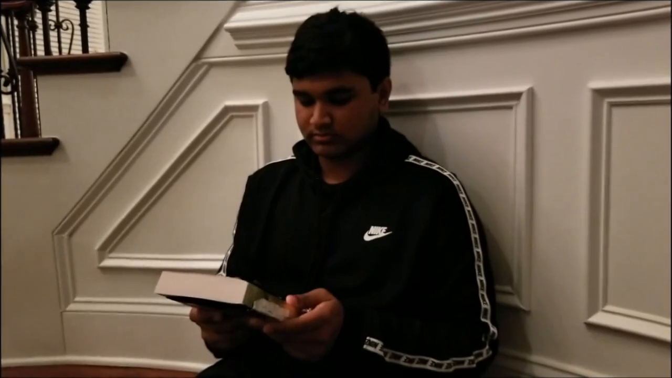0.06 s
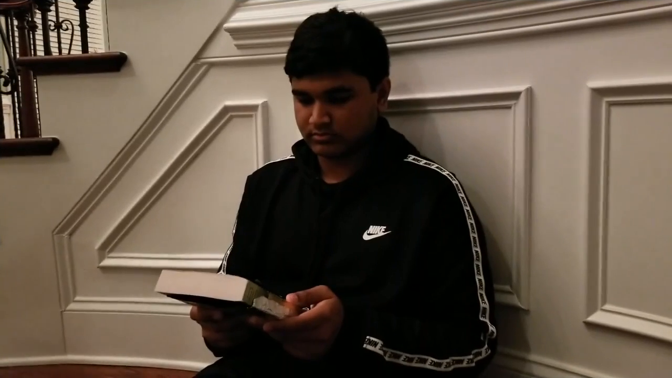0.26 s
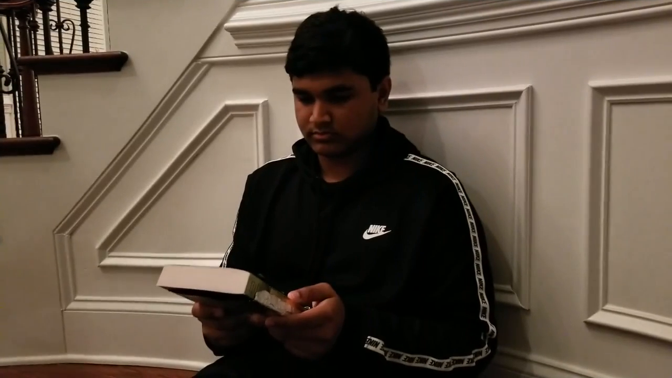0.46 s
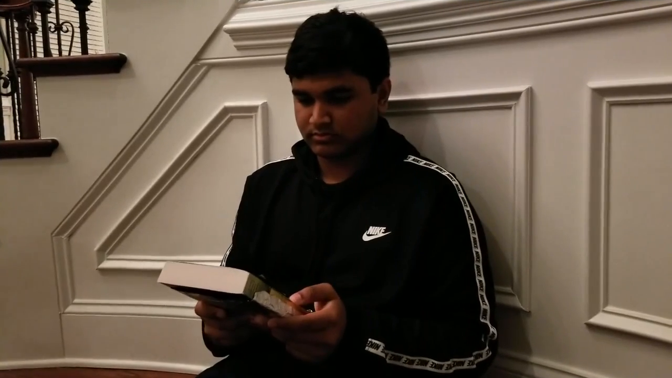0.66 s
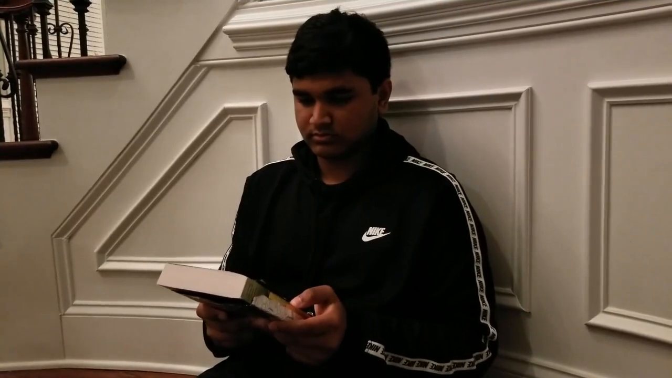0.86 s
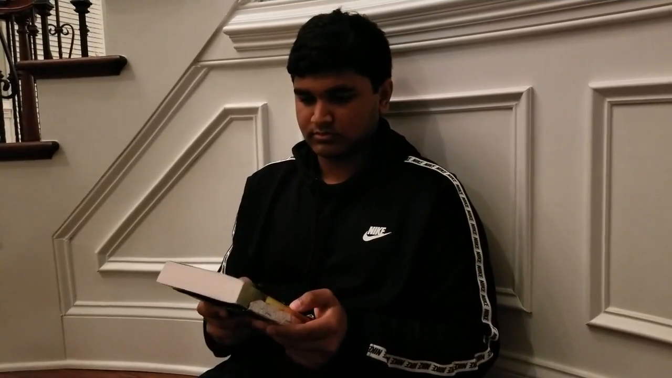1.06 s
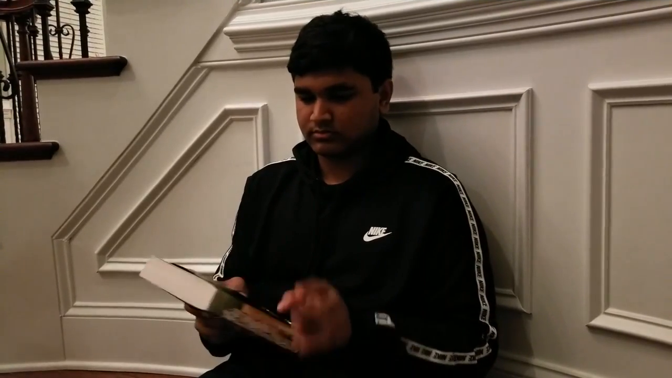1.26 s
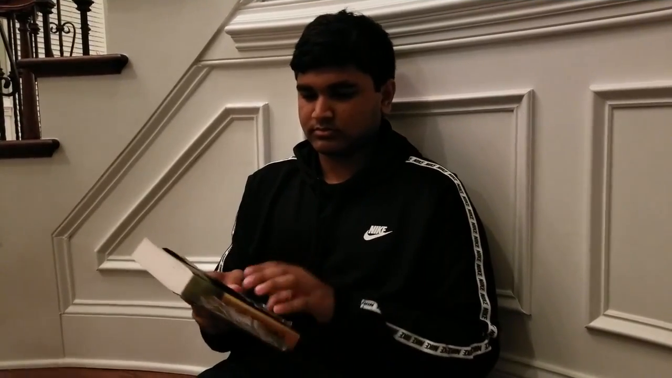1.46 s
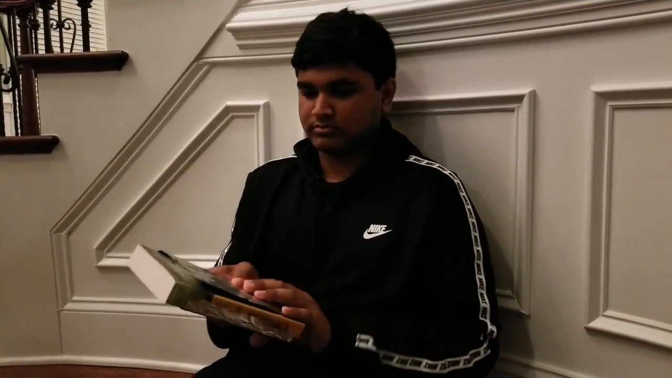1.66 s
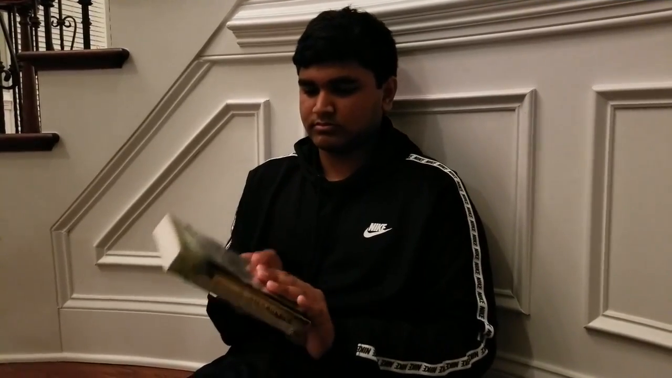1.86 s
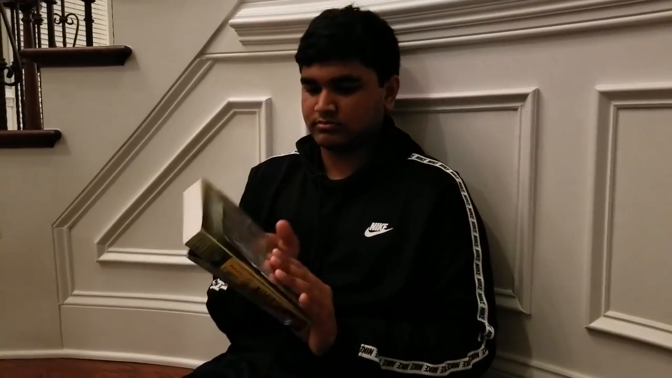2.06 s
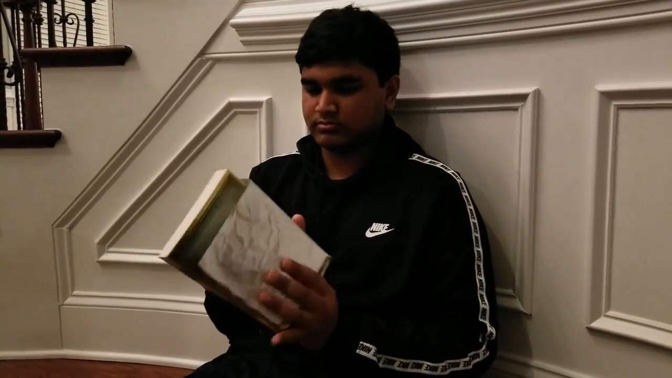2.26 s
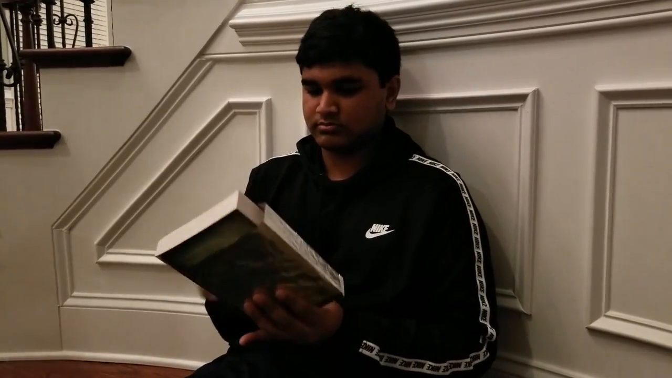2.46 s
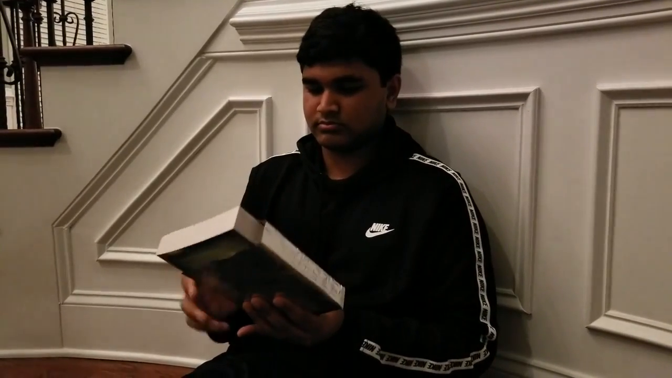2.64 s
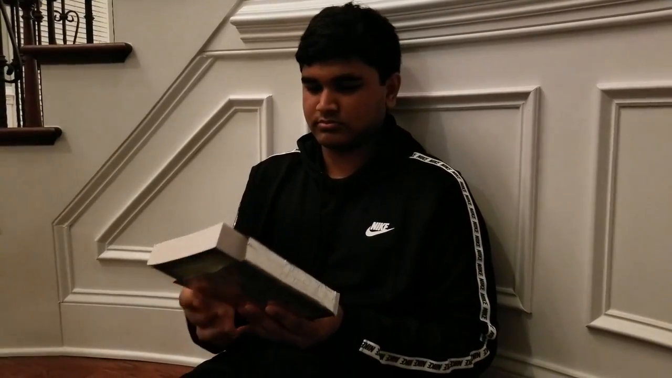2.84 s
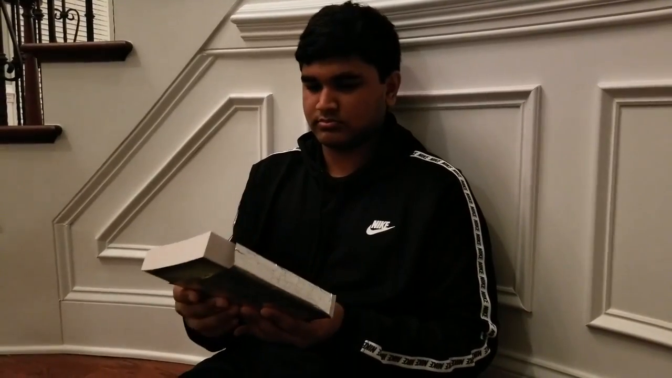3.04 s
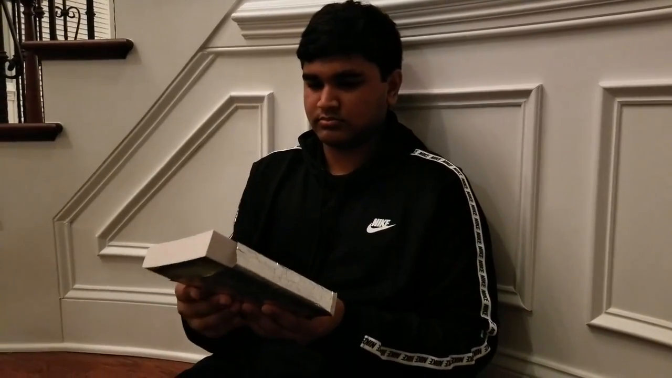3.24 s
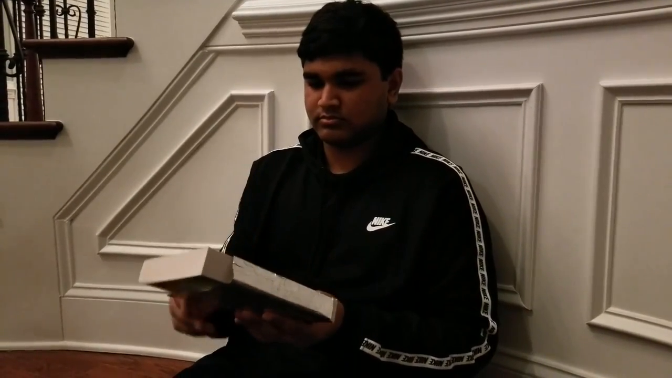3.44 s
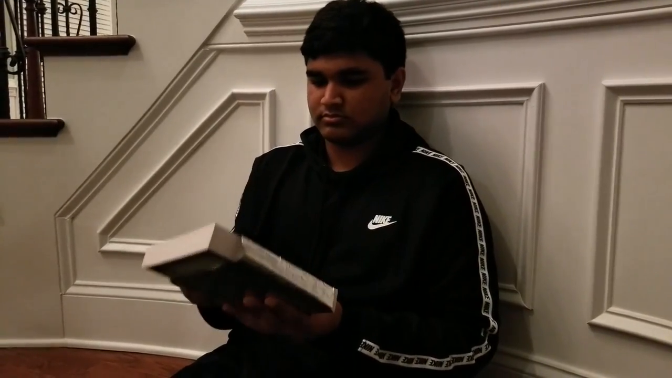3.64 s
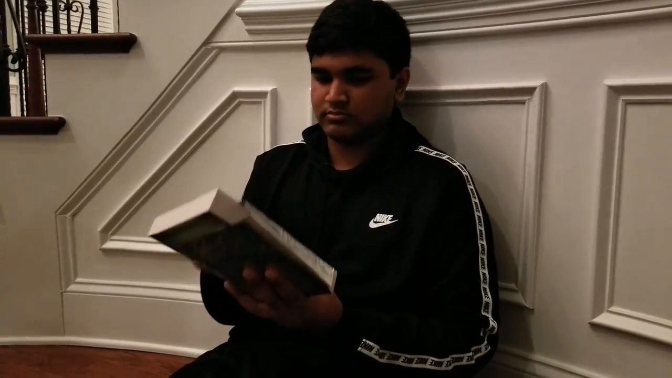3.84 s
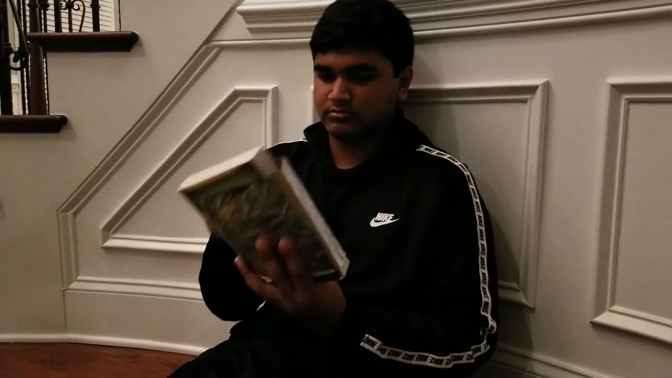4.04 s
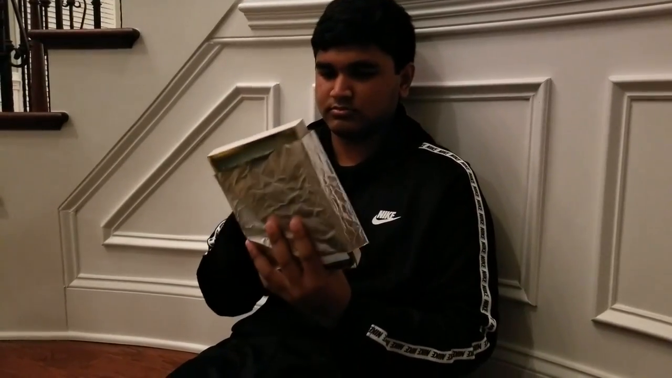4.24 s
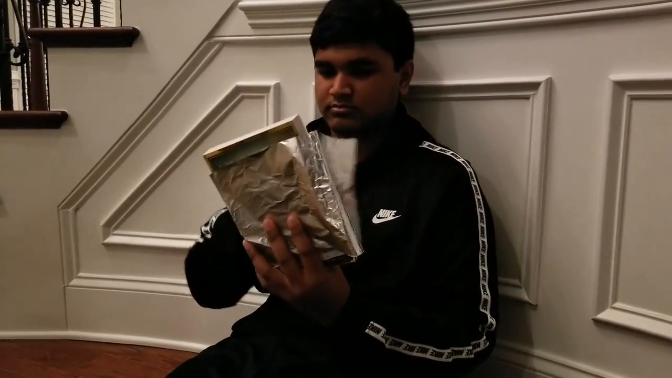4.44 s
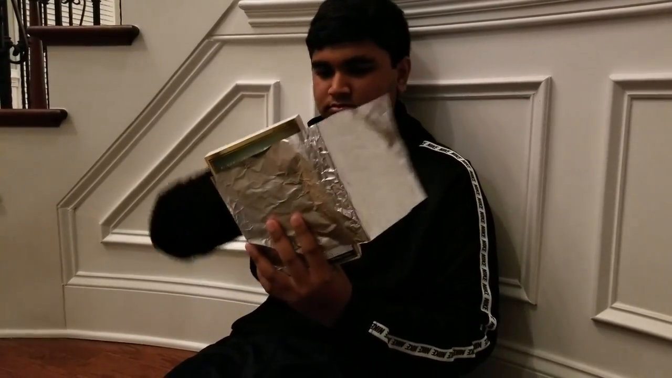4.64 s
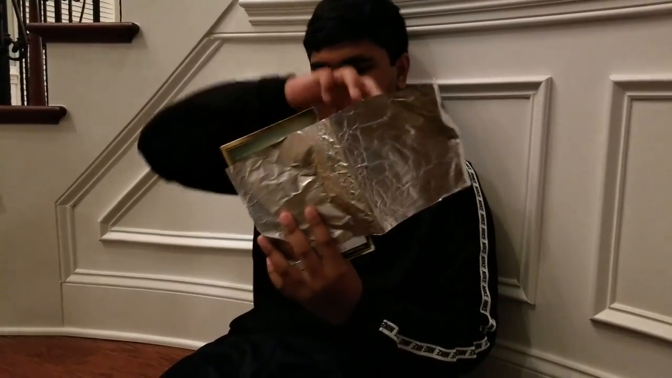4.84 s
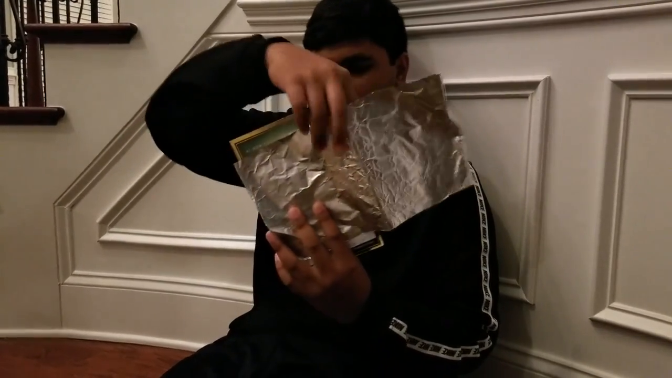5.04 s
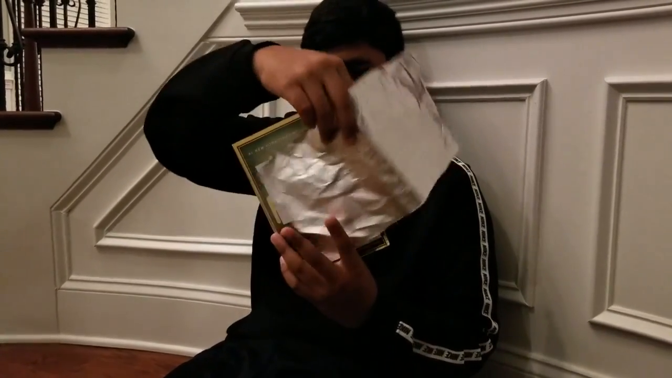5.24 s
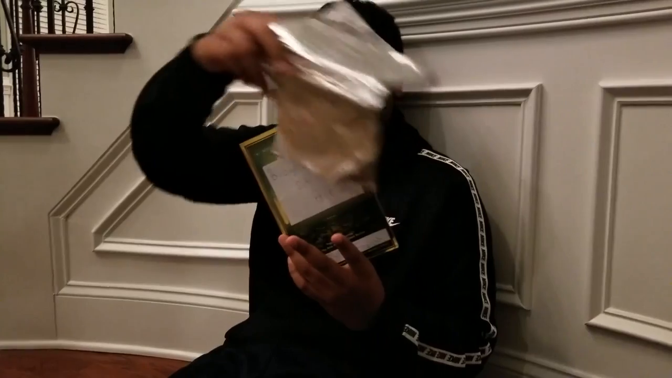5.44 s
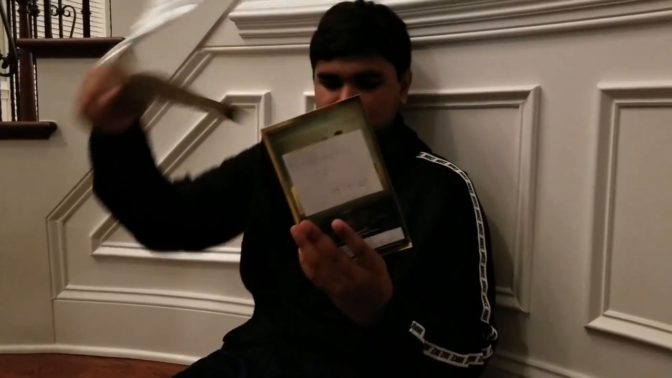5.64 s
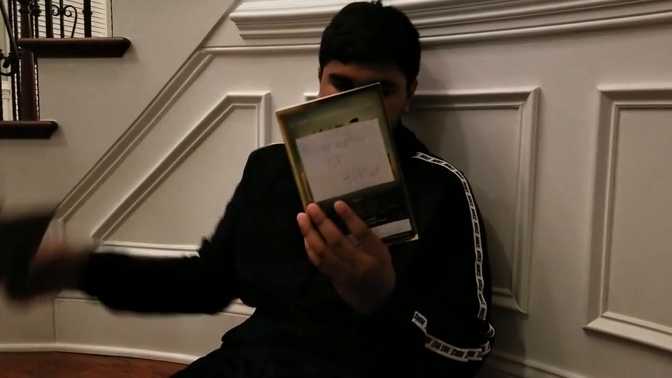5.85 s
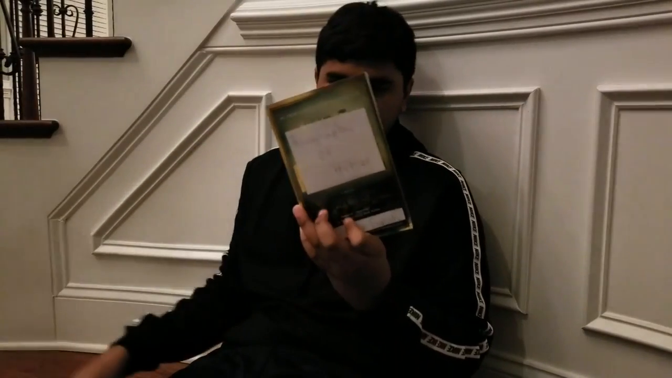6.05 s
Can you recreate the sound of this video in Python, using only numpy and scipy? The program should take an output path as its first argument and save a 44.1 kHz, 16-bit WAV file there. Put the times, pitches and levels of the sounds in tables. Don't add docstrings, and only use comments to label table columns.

```python
import sys
import numpy as np
from scipy import signal
from scipy.io import wavfile

SR = 44100
rng = np.random.default_rng(int(sys.argv[2]) if len(sys.argv) > 2 else 0)


def gain_from_db(level_db):
    decades = np.asarray(level_db, float) / 20
    return 10 ** decades


def unload_audio(sound):
    columns = np.transpose(np.atleast_2d(sound))
    steps = np.round(np.clip(columns, -1, 1) * 32767)
    wavfile.write(sys.argv[1], SR, steps.astype(np.int16))


N = 269010

# low_hz, high_hz
ZONES = [
    (3000, 9000),
    (9000, 16000),
    (900, 3000),
    (300, 620),
]
# pitch_hz, density_db (per Hz)
SHEET_COLOUR = [(150, -47), (250, -18.5), (381, -17), (487, -16), (795, -19.5), (1030, -12), (1320, -15),
                (1880, -9.5), (2850, -7.5), (3920, 2), (6070, 0.5), (9420, 1), (12500, 7), (15700, 3),
                (16500, -24)]
# peak_s, level_db, swell_s (per 60 dB), fade_t60_s,
# brightness_db
HAND_STROKES = [(0.189, -62.5, 5, 0.29, 8.5), (.599, -69, -0.5, 1.1, 5.5), (.85, -77.5, 10, 2.9, 11),
                (1.013, -72.5, 0.4, 1.4, 11.5), (1.192, -53.5, 0.13, 0.47, 3), (1.536, -54, 0.02, 0.47, 7.5),
                (1.891, -51, .5, 0.79, 3.5), (2.116, -51.5, 0.44, 0.56, 1.5), (2.121, -41, 0.14, 0.044, -2),
                (2.224, -58.5, -0.5, 0.068, 8), (2.444, -39, 0.22, 0.37, 0.5), (2.64, -67, -5.36, 5.5, -5),
                (2.963, -44, 0.2, 0.31, -1.5), (3.171, -50, 0.24, 0.14, 1), (3.25, -56.5, 0.6, 0.2, -15),
                (3.418, -52.5, -0.07, 0.48, 3), (3.573, -45.5, 0.31, 0.48, -11),
                (3.695, -44, 0.02, 0.74, -7.5),
                (3.922, -43.5, 0.76, 0.6, -7), (4.046, -43.5, 0.2, 0.69, -4), (4.196, -45.5, 0.5, 0.58, 1),
        (4.12, -50.5, 0.5, 0.087, 6), (4.27, -40.5, 0.03, 0.11, -1), (4.281, -42.5, 1, 1.9, -5.5),
        (4.619, -42.5, -0.08, 0.28, 10), (5.084, -30, 0, 0.79, 1.5), (5.148, -28.5, 0.04, 0.091, -13),
        (5.295, -29, 0.1044, 0.23, 0.5), (5.32, -35.5, 0.14, 0.11, 2), (5.635, -42, 0.77, 0.14, 2),
        (5.7, -55, 3.5, 1.1, -11), (5.849, -47, -0.34, 0.29, -7), (5.967, -46.5, 0.1, 1.9, -8),
        (6.099, -38, 0.28, .2, -13)]
# start_s, length_s, level_db, brightness_db
PULLS = [
    (4.368, 0.16, -44.5, -23),
    (4.618, .275, -45, -3),
    (5.374, 0.16, -46.5, 8),
]
# time_s, low_zone_minus_middle_db
LOOSE = [(.19, -12), (2, -16), (2.4, -15.5), (3, -16), (3.2, -28), (3.42, -9), (3.57, -21), (3.7, -7.5),
         (3.92, -22), (4.19, -12.5), (4.25, -8.5), (4.3, -17), (4.47, -9), (4.6, 0), (4.7, -7.5),
         (4.95, -1.5), (5.15, -18), (6, -18)]
RESTING_DB = [-97, -97, -88, -81.5]
# start_s, peak_db, brightness_db, ring_t60_s
TICKS = [(.4906, -45.5, 0, 0.045), (.5806, -28.5, 0, 0.013), (.7513, -32, -2.5, 0.02),
         (.9977, -42, 12, 0.061), (1.0994, -44, 7.5, 0.047), (1.152, -42.5, 14, 0.028),
         (1.1653, -30, -7, 0.024), (1.2648, -33.5, 2.5, 0.039), (1.3873, -45.5, -7, 0.05),
         (1.519, -44.5, 10, 0.071), (1.5255, -35, 12, 0.024), (1.577, -35, -1, 0.075),
         (1.694, -54, 13.5, 0.048), (1.7552, -33.5, 12.5, 0.023), (1.8146, -46, 6, 0.12),
         (1.8422, -39.5, 7, 0.024), (1.8824, -38, 1, 0.057), (1.8976, -31.5, 1, 0.023),
         (1.935, -37.5, 4.5, 0.14), (2.0344, -48, 8, .03), (2.0562, -39, 2, 0.077),
         (2.1138, -19.5, -5, 0.032), (2.3775, -44.5, 1, .022), (2.392, -31, -4, 0.14),
         (2.4099, -34.5, 2.5, 0.19), (2.899, -42, -5.5, 0.16), (2.913, -39, 2, 0.13),
         (2.9495, -21, -7.5, 0.052),
         (3.276, -39.5, 1, 0.014), (3.403, -36, -11, 0.082), (3.464, -25.5, -11, .041),
                (3.4965, -31.5, 2, 0.019), (3.556, -29, -5, 0.073), (3.565, -34.5, 2, 0.18),
                (3.712, -26.5, 1, 0.042), (3.8237, -23.5, -10.5, 0.04), (4.177, -35, 9.5, 0.019),
                (4.2, -22, 2, 0.03), (4.4619, -16, -3.5, 0.048), (4.491, -25.5, -5.5, 0.085),
                (4.752, -23.5, 0, 0.084), (5.091, -14.5, 0, 0.021), (5.1356, -21, -1, 0.0097),
                (5.147, -18.5, 4, 0.036), (5.1523, -18, 1.5, 0.047), (5.2213, -23.5, -4.5, 0.28),
                (5.27, -17.5, -3, 0.041), (5.727, -31, -7, 0.084), (5.841, -30.5, -10, 0.079),
                (6.0164, -24, 0, 0.061)]
# start_s, peak_db, brightness_db, ring_t60_s
CRACKS = [(.1884, -56, -5, .03), (.3155, -29.5, 7, 0.0073), (.3641, -50.5, 8, 0.035),
          (.5445, -52, 11, 0.041), (.6184, -49.5, 9, 0.033), (.7078, -49, 12, 0.023),
          (.842, -49, 16.5, 0.041), (1.1755, -31, 5, 0.018), (1.1988, -30.5, 6.5, 0.045),
          (1.208, -34, 10, 0.018), (1.511, -48.5, 7, 0.064), (1.7368, -48, 7, 0.064),
          (2.1915, -37.5, 4, 0.043), (2.208, -51, 18, 0.041), (2.309, -41.5, 2.5, 0.1),
          (2.432, -24.5, 6, 0.021), (2.4345, -37, -8, 0.22), (3.2106, -40, 7.5, 0.018),
          (3.2343, -43, 2, 0.058), (3.414, -29, 3, 0.087), (3.6531, -30.5, -8, 0.15),
          (3.6656, -29, -22, 0.082), (3.6744, -36, 2, 0.063), (3.688, -39, 0, 0.038),
          (3.699, -41, 0, 0.036), (3.7475, -30.5, -5, 0.029), (3.779, -26, -4, 0.03),
          (3.7974, -22, 2, 0.025), (3.8551, -30, -2, 0.12), (3.9025, -39, -3, 0.027),
          (3.967, -37.5, 5, 0.09), (4.029, -27.5, -13, 0.13), (4.041, -26, -3.5, 0.085),
               (4.174, -28.5, 0, 0.026), (4.2152, -24.5, 0, 0.031), (4.278, -23, 0, 0.037),
               (4.2884, -29, 11.5, 0.032), (4.374, -24.5, 0.5, 0.047), (4.385, -24.5, 0, 0.019),
               (4.425, -22, 2, 0.053), (4.534, -21.5, -2.5, 0.065), (4.5532, -28, -21, 0.04),
               (4.609, -24.5, -4, 0.07), (4.615, -24, -3, 0.081), (4.633, -28, 8, 0.04),
               (4.7053, -23.5, -4.5, 0.11), (4.785, -27, 10.5, 0.041), (4.824, -21, 1, 0.076),
               (4.867, -46, -17, .032), (4.895, -23.5, -2, 0.1), (5.0777, -30, -9, 0.026),
               (5.102, -21.5, -2, 0.049), (5.113, -30, -19, 0.038), (5.173, -23, -11, 0.037),
               (5.4504, -26, -9, 0.052), (5.572, -48, 23, 0.022), (5.595, -22, 8.5, 0.029),
               (5.945, -40, -26, 0.11), (5.9658, -29, -2, 0.0094), (6.002, -29.5, -8, 0.27),
               (6.084, -26, 2, 0.036), (6.0921, -27, 13.5, 0.022)]
# start_s, peak_db, brightness_db, left_minus_right_db
CLICKS = [(0.3153, -30, 1, 6), (0.581, -27.5, 8, 6), (0.7516, -48, 0, -1), (1.0224, -36, 0, 3.5),
          (1.1164, -40, 8, -1.0), (1.152, -28, -1, 6), (1.1742, -24, -2, 17), (1.1986, -25, 5, 6),
          (1.2084, -26, 5, 8.5), (1.2645, -23.5, -4, 17), (1.7559, -28, -1, 7.5), (1.7555, -34, 20, -5),
          (1.8841, -36, 0, -1), (1.897, -37, 0, 2), (1.9844, -32, -2, -3), (2.0674, -30, 0, 4),
          (2.1919, -32, -5, 15), (2.2087, -29, 0, 1), (2.223, -35, 0, 4.0), (2.3096, -35, 6, 7),
          (2.3915, -34, 7, 2.0), (2.9497, -21, 0, -8), (3.2095, -34, -1, 3.5), (3.2755, -37, 0, 10),
          (3.497, -32, 2, 7), (3.6676, -29, 0, 1.0), (3.713, -37, -3, -1), (3.7479, -33, -2, 3.0),
          (3.7972, -9, -3, 7), (3.902, -27, 4, 5), (4.0426, -33, 4, -1), (4.1778, -19, 0, 2),
          (4.2009, -20, 5, 9), (4.2767, -21, 7, 2.5), (4.289, -27, 0, 2.0), (4.3842, -14, -4, 6),
          (4.4267, -24, -3, 4.5), (4.4653, -20, 3, 9), (4.4902, -18, -2, 0), (4.5379, -17.5, 0, 13.5),
          (4.787, -28, 3, -4), (5.0804, -18, -11, 2.5), (5.092, -20, -6, 2), (5.1165, -19, 2, 2.5),
          (5.1485, -8, 1, 3), (5.1713, -8, 3, 4), (5.22, -30, -2, 2.0), (5.5949, -24, -4, 2),
          (5.967, -29, 2, 7), (6.0921, -16, 0, 4)]
# start_s, level_db, pitch_hz, fade_t60_s
FLAPS = [(0.188, -60, 1160, 0.056), (.315, -52, 4650, 0.026), (.362, -67, 4600, 0.07),
         (.5805, -47.5, 5120, 0.025), (.5805, -37, 13900, .03), (2.114, -34.5, 7850, 0.048),
         (2.209, -36, 13600, .04), (2.432, -50, 11700, .05), (3.158, -55, 4200, 0.13),
         (3.235, -56.5, 3860, 0.19), (3.235, -53, 7530, .1), (3.372, -60.5, 4700, .05),
         (3.424, -44, 4600, .08), (3.465, -46, 5070, 0.037), (3.575, -39, 4600, 0.058),
         (3.598, -47, 4040, 0.058), (3.795, -36, 4030, 0.046), (3.825, -38, 4300, 0.043),
         (3.936, -51, 4940, .05), (4.2, -35, 13300, .04), (4.216, -39, 13500, .05), (4.259, -45, 6000, .15),
         (4.286, -39, 6450, .07), (4.382, -33, 4230, .05), (4.426, -36, 6700, .05),
         (4.464, -25, 12200, .04), (4.465, -29.5, 6260, 0.056), (4.466, -37.5, 3850, 0.074),
         (4.538, -30, 13700, .04), (4.54, -40, 5100, .06), (4.618, -38, 6400, .09), (4.635, -41, 6340, 0.1),
         (4.83, -41, 9900, 0.077), (4.898, -41, 3870, .08), (5.091, -19, 6130, 0.044),
         (5.093, -31, 11500, .04), (5.122, -29, 5940, 0.062), (5.15, -36, 6800, .04),
         (5.154, -28, 4400, 0.064), (5.174, -39, 3780, 0.089), (5.22, -34, 5000, .08),
         (5.242, -33, 12400, 0.086), (5.27, -34.5, 3780, 0.13), (5.274, -32, 7700, 0.055),
         (5.292, -38, 3920, .1), (5.305, -43, 3540, 0.097), (5.441, -35, 5600, .12),
         (5.524, -46, 3100, 0.082), (5.62, -44.5, 6630, 0.14), (6.02, -38, 5360, .06)]
# start_s, peak_db, pitch_hz, fade_t60_s
THUMPS = [(2.104, -71, 112, 0.09), (3.68, -54, 225, 0.092), (4.629, -67, 100, 0.12),
          (4.839, -48.5, 97, 0.2), (5.078, -45, 131, 0.12), (5.107, -51, 191, 0.063),
          (5.138, -46, 152, 0.11), (5.171, -52.5, 116, 0.12), (2.44, -59, 202, 0.074),
          (1.62, -57, 262, 0.065), (5.75, -56, 100, .1)]
# start_s, peak_db, pitch_hz, fade_t60_s
TAPS = [(2.098, -54.5, 420, 0.097), (4.058, -62, 444, 0.28), (4.633, -49, 438, 0.094),
        (4.653, -48, 494, 0.16), (4.789, -52, 448, 0.11), (4.25, -46.5, 870, 0.053),
        (4.655, -48, 1040, .08), (4.861, -51, 1425, 0.089), (5.151, -49, 1078, 0.1),
        (5.296, -45.5, 1130, 0.082), (5.305, -58, 466, 0.063), (1.531, -65.5, 370, 0.22),
        (1.8, -72, 316, 0.073), (6.087, -45, 274, 0.047), (6.09, -48.5, 527, 0.07)]
# time_s, left_minus_right_db
PARCEL_SIDE = [(.19, 11.5), (1, 6.5), (1.75, 9.5), (2.3, 5.5), (2.6, 10), (2.9, 7), (3.5, 7), (4.2, 6.5),
               (4.8, 7), (5.5, 7.5), (6.1, 10.5)]
# pitch_hz, left_minus_right_db
PORT_BALANCE = [(60, 2.0), (110, 2.0), (200, 15), (380, 5), (700, 6), (1290, 5.5), (2380, 5), (4400, -4.5),
                (8120, 1), (15000, -5.5)]
# pitch_hz, likeness (0 to 1)
LIKENESS = [(60, .92), (130, .8), (290, .75), (640, .55), (1400, .3), (3100, .2), (7000, .08), (15000, .05)]
# peak_s, level_db, swell_s (per 60 dB), fade_t60_s
KNOCK = [
    (.2, -55, 0.15, 0.6),
    (.309, -56, 0.11, 0.37),
    (.579, -73, 0.055, 0.21),
]
# pitch_hz, width_hz, level_db
KNOCK_MODES = [(354, 15, 4), (452, 28, -6.5), (202, 37, -3.5), (60, 21, -13.5)]
# pitch_hz, fade_t60_s
HALL_FADE = [(300, 0.06), (3000, 0.29), (12000, 0.29)]
# pitch_hz, density_db
HOUSE_COLOUR = [(12, -34), (20, 9), (91, 5), (121, -1), (184, -6), (583, -23.5), (3230, -27.5), (3830, -40),
                (4790, -23.5), (6710, -28.5), (12500, -27), (15200, -35), (16500, -45)]
# time_s, level_db
OPENING = [(0, -19), (.09, -31), (.14, -55), (.15, -92), (.184, -90), (.189, 0.5), (6.1, 1.5)]

BUCKLES_PER_S, BUCKLE_SPREAD_DB, CLUMP_DB, BUCKLE_T60_S = 1600, 3, 2.5, .022
TENSING_S, TENSING_DB = .008, -6
TOP_FOLLOWS, LOW_FOLLOWS, BOX_FOLLOWS = 1.26, 0.97, 1
BOX_DB, BOX_LOOSE_SHARE = -17.5, 0.84
PULL_SWELL_S, PULL_FADE_S = 0.054, 0.29
PULL_ROUGHNESS = .65
TICK_LOW_DB, CRACK_LOW_DB = -64, -19
SOFT_DEPTH = 0.073
RISE_SHARE, CRACK_SLOWER = .03, 2.45
SPIKE_DB, SPIKE_T60_S = -9.5, 0.0025
SNAP_LEFT_DB = 2
CLICK_DB, CLICK_COLOUR_DB = -10, 5
REBOUND_S, REBOUND_DB = 0.00097, -4.5
FLAP_WIDTH_SHARE = 0.086
FLAP_RISE_S, FLAP_LEFT_DB = 0.0011, 4
HALL_DB = -9
HOUSE_DB, HOUSE_PATCHY_DB = -63, .7
HUM_HZ, HUM_WIDTH_HZ, HUM_DB = 100, 13.8, -68


def rms_one(x):
    return x / np.sqrt(np.mean(x ** 2) + 1e-20)


def in_time(rows):
    time_s, *columns = np.transpose(rows)
    return [np.interp(np.arange(N) / SR, time_s, column) for column in columns]


def at_hz(points, hz):
    pitch_hz, value = np.transpose(points)
    return np.interp(np.log(hz), np.log(pitch_hz), value)


def panned(db):
    return gain_from_db(np.outer([.5, -.5], db))


def drift(rate_hz):
    r = np.exp(-80 * np.pi * rate_hz / SR)
    slow = signal.lfilter([1], [1, -2 * r, r * r], rng.standard_normal(N // 40 + 2002))[2000:]
    return np.interp(np.arange(N) / 40, np.arange(len(slow)), rms_one(slow))


def bands(low_hz, count):
    edges = np.geomspace(low_hz, 17500, count + 1)
    return zip(edges, edges[1:], np.sqrt(edges[1:] * edges[:-1]))


def band_pass(x, low, high):
    return signal.sosfilt(signal.butter(2, [low, high], "band", fs=SR, output="sos"), x)


def band_pair(two_noises, low, high, hz):
    mid, side = band_pass(two_noises, low, high)
    alike = np.clip(at_hz(LIKENESS, hz), 0, 1)
    return np.sqrt(1 + alike) * mid + np.sqrt(1 - alike) * side * [[1], [-1]]


def resonance(hz, width_hz):
    r = np.exp(-np.pi * width_hz / SR)
    return [1, 0, -1], [1, -2 * r * np.cos(2 * np.pi * hz / SR), r * r]


def resonant_noise(hz, width_hz):
    mid, side = signal.lfilter(*resonance(hz, width_hz), rng.standard_normal((2, N)))
    return rms_one(mid + 0.28 * side * [[1], [-1]])


def dying(clicks, t60_s):
    return signal.lfilter([1], [1, -gain_from_db(-60 / (t60_s * SR))], clicks + 1e-18)


def swell_db(peak_s, hold_s, swell_s, fade_s):
    t = np.arange(N // 32 + 2) * 32 / SR
    before = np.maximum(peak_s - t, 0) / max(swell_s, .004)
    after = np.maximum(t - peak_s - hold_s, 0) / max(fade_s, .004)
    return -60 * (before + after)


def power_sum_db(levels_db):
    total_db = 10 * np.log10(sum(gain_from_db(2 * db) for db in levels_db))
    return np.interp(np.arange(N) / 32, np.arange(len(total_db)), total_db)


def density_db(zone_db, hz):
    low, high = np.transpose(ZONES[:len(zone_db)])
    centre = np.sqrt(low * high)
    order = np.argsort(centre)
    offsets_db = -10 * np.log10((high - low) / (SR / 2)) - at_hz(SHEET_COLOUR, centre)
    level_db = at_hz(SHEET_COLOUR, hz)
    for k, (zone, offset) in enumerate(zip(zone_db, offsets_db)):
        share = np.interp(np.log(hz), np.log(centre[order]), order == k)
        level_db = level_db + share * (zone + offset)
    return level_db


def hands():
    gestures = [(swell_db(s, 0, up, down), db, top, s) for s, db, up, down, top in HAND_STROKES]
    for s, hold, db, top in PULLS:
        gestures.append((swell_db(s, hold, PULL_SWELL_S, PULL_FADE_S), db, top, s + hold / 2))
    zones = [[], [], [], []]
    for swell, db, top, s in gestures:
        loose_db = np.interp(s, *np.transpose(LOOSE))
        zones[0].append(db + swell)
        zones[1].append(db + top + TOP_FOLLOWS * swell)
        zones[2].append(db + loose_db + LOW_FOLLOWS * swell)
        zones[3].append(db + BOX_DB + BOX_LOOSE_SHARE * loose_db + BOX_FOLLOWS * swell)
    return [power_sum_db([*zone, rest]) for zone, rest in zip(zones, RESTING_DB)]


def snaps():
    kinds = [(TICKS, TICK_LOW_DB, RISE_SHARE),
             (CRACKS, CRACK_LOW_DB, RISE_SHARE * CRACK_SLOWER)]
    rows = []
    for table, low, rise in kinds:
        for s, db, top, t60 in table:
            rows.append((s, db, top, low - SOFT_DEPTH * (db + 12), t60, rise))
    return np.transpose(sorted(rows))


def snap_shapes(age, t60_s, rise_share):
    t60_s = np.clip(t60_s, .005, .2)[:, None]
    ring = gain_from_db(-60 * age / t60_s)
    spike = gain_from_db(SPIKE_DB - 60 * age / SPIKE_T60_S)
    return (ring + spike) * np.clip(age / (rise_share[:, None] * t60_s), 0, 1)


def paper(colour_db=-1.0, snap_colour_db=2.5, patchy_db=2.5, crackle_db=-0.5):
    t, age = np.arange(N) / SR, np.arange(SR // 10) / SR
    zone_db = hands()
    born = np.flatnonzero(rng.random(N) < BUCKLES_PER_S * gain_from_db(CLUMP_DB * drift(14)) / SR)
    sizes_db = BUCKLE_SPREAD_DB * np.minimum(rng.exponential(1, len(born)), 4)
    s, peak_db, top_db, low_db, t60_s, rise_share = snaps()
    shapes = snap_shapes(age, t60_s, rise_share)
    colours_db = snap_colour_db * rng.standard_normal((len(s), 18))
    to_next_s = np.append(s, 99)[np.searchsorted(s, t)] - t
    taut_db = TENSING_DB * np.clip(1.5 - to_next_s / TENSING_S, 0, 1)
    pulling = sum((t > at) & (t < at + hold) for at, hold, *_ in PULLS)
    roughness = np.where(pulling, PULL_ROUGHNESS, 1)
    white, out = rng.standard_normal((2, 2, N)), 0
    for k, (low, high, hz) in enumerate(bands(228.8, count=18)):
        clicks = np.zeros(N)
        clicks[born] = gain_from_db(2 * (sizes_db + colour_db * rng.standard_normal(len(born))))
        buckle_t60_s = BUCKLE_T60_S * (6000 / hz) ** 0.77
        grain = rms_one(np.sqrt(dying(clicks, buckle_t60_s / 2))) ** roughness
        level_db = density_db(zone_db, hz) + crackle_db + taut_db
        crackle = grain * gain_from_db(level_db + patchy_db * drift(10.6))
        snap_db = density_db([peak_db, peak_db + top_db, peak_db + low_db], hz)
        gains = gain_from_db(snap_db + colours_db[:, k] - 8.0)
        snap = np.zeros(N + len(age))
        for at, gain, shape in zip((s * SR).astype(int), gains, shapes):
            snap[at:at + len(age)] += gain * shape
        snap = snap[:N]
        burst = white[k % 2] * np.hypot(crackle, snap)
        left_db = at_hz(PORT_BALANCE, hz) - 3 + SNAP_LEFT_DB * snap / (snap + crackle)
        out = out + band_pair(burst, low, high, hz) * panned(left_db)
    return out * panned(*in_time(PARCEL_SIDE)) / np.sqrt(2)


def flips():
    s, peak_db, top_db, left_db = np.transpose(CLICKS)
    chance, out = rng.standard_normal((len(s), 22)), 0
    for k, (low, high, hz) in enumerate(bands(230.0, count=18)):
        click_db = density_db([peak_db, peak_db + top_db, peak_db + CRACK_LOW_DB], hz)
        gains = gain_from_db(click_db + CLICK_DB + CLICK_COLOUR_DB * chance[:, k])
        strokes = np.full((2, N + SR // 10), 1e-18)
        for turn in range(3):
            late_s = turn * REBOUND_S * gain_from_db(3 * chance[:, 18 + turn])
            at = ((s + late_s) * SR).astype(int) + np.array([[0], [turn]])
            rebound = gain_from_db(REBOUND_DB * turn) * (-1) ** turn
            strokes[[[0], [1]], at] += gains * rebound * panned(left_db)
        out = out + band_pass(strokes, low, high) * (-1) ** k
    return out[:, :N]


def flaps():
    out, age = np.zeros((2, N + SR // 5)), np.arange(SR // 5) / SR
    for s, db, hz, t60_s in FLAPS:
        forward, back = resonance(hz, FLAP_WIDTH_SHARE * hz)
        section = forward + back
        buzz = rms_one(signal.sosfilt([section, section], rng.standard_normal((2, len(age)))))
        shape = gain_from_db(db - 60 * age / max(t60_s, .01)) * np.clip(age / FLAP_RISE_S, 0, 1)
        at = int(s * SR)
        out[:, at:at + len(age)] += buzz * shape
    return out[:, :N] * panned(FLAP_LEFT_DB)


def thumps(left_db=5.0, rise_s=0.0019):
    out, age = np.zeros(N + SR // 4), np.arange(SR // 4) / SR
    for s, peak_db, hz, t60_s in THUMPS + TAPS:
        shape = gain_from_db(peak_db - 60 * age / t60_s) * np.clip(age / rise_s, 0, 1)
        at = int(s * SR)
        out[at:at + len(age)] += shape * np.sin(2 * np.pi * hz * age)
    return out[:N] * panned(left_db)


def knock(left_db=4.0):
    swells_db = [db + swell_db(s, 0, up, down) for s, db, up, down in KNOCK]
    level_db = power_sum_db(swells_db + [-130])
    body = sum(gain_from_db(db) * resonant_noise(hz, width_hz) for hz, width_hz, db in KNOCK_MODES)
    return gain_from_db(level_db - 6.0) * body * panned(left_db)


def hall(x):
    age, tail = np.arange(SR // 2) / SR, 0
    for low, high, hz in bands(71.0, count=7):
        noise = band_pair(rng.standard_normal((2, len(age))), low, high, hz)
        tail = tail + noise * gain_from_db(-60 * age / at_hz(HALL_FADE, hz))
    tail = tail * np.clip(age / 0.0074, 0, 1) / np.sqrt(np.sum(tail ** 2) / 2)
    mono = x.mean(axis=0, keepdims=True)
    return signal.fftconvolve(mono, tail, axes=1)[:, :N] * panned(0.46)


def house(left_db=3.0):
    white, rumble = rng.standard_normal((2, 2, N)), 0
    for k, (low, high, hz) in enumerate(bands(19.6, count=19)):
        level_db = at_hz(HOUSE_COLOUR, hz) + HOUSE_PATCHY_DB * drift(2.4)
        rumble = rumble + band_pair(white[k % 2], low, high, hz) * gain_from_db(level_db)
    hum = gain_from_db(HUM_DB) * resonant_noise(HUM_HZ, HUM_WIDTH_HZ)
    return (gain_from_db(HOUSE_DB + 1) * rms_one(rumble) + hum) * panned(left_db)


def earlier_room(hiss_db=-57.0, hiss_hz=2730.0, rumble_db=-60.0, rumble_hz=137.0):
    hiss_low_pass = signal.butter(2, hiss_hz, fs=SR, output="sos")
    hiss = signal.sosfilt(hiss_low_pass, rng.standard_normal((2, N)))
    rumble_low_pass = signal.butter(2, rumble_hz, fs=SR, output="sos")
    rumble = signal.sosfilt(rumble_low_pass, rng.standard_normal(N))
    return gain_from_db(hiss_db) * rms_one(hiss) + gain_from_db(rumble_db) * rms_one(rumble)


def scene():
    near = paper() + flips() + thumps()
    here = near + gain_from_db(HALL_DB) * hall(near) + house() + knock() + flaps()
    return np.where(np.arange(N) < SR // 6, earlier_room(), here)


def low_pass(x):
    return signal.sosfilt(signal.butter(12, 17000, fs=SR, output="sos"), x)


def record(dry):
    opening_db, = in_time(OPENING)
    top = signal.cheby2(16, 38, 16000, fs=SR, output="sos")
    bottom = signal.butter(5, 31, "high", fs=SR, output="sos")
    mix = signal.sosfilt(np.vstack([top, bottom]), dry) * gain_from_db(opening_db)
    return low_pass(mix)


dry = scene()
out = record(dry)
unload_audio(out)
```